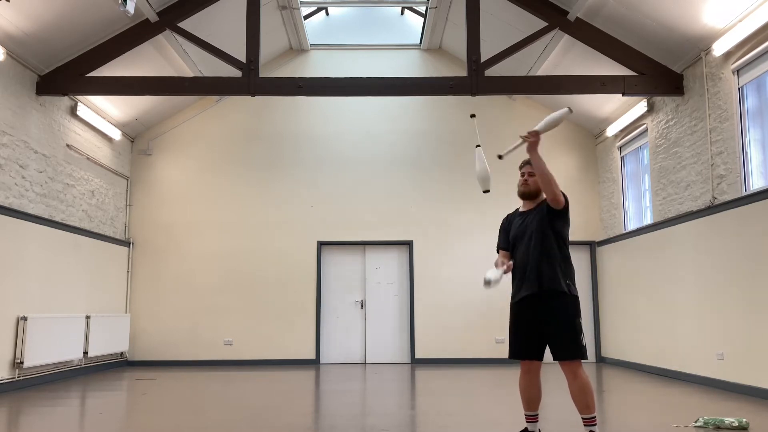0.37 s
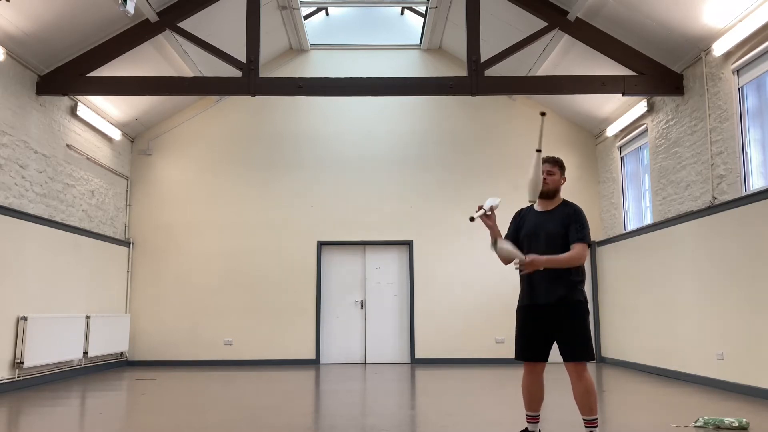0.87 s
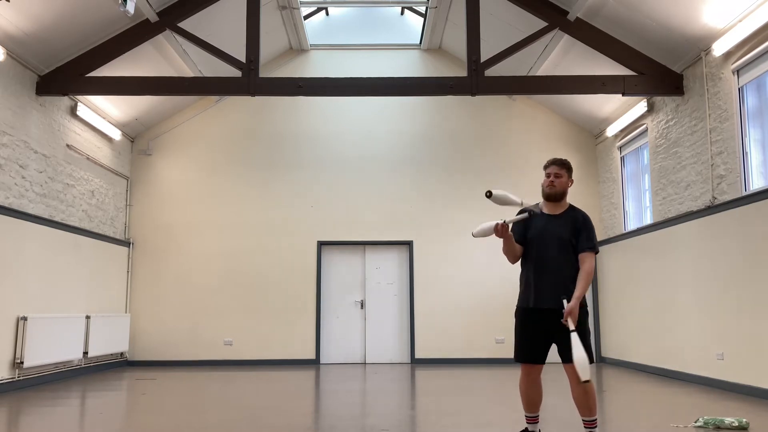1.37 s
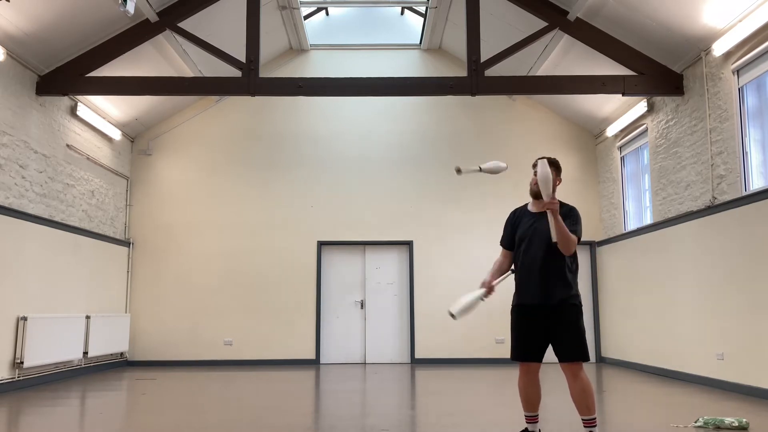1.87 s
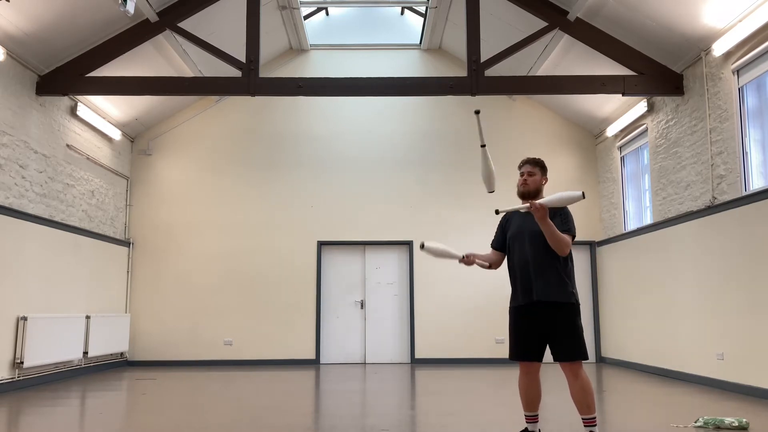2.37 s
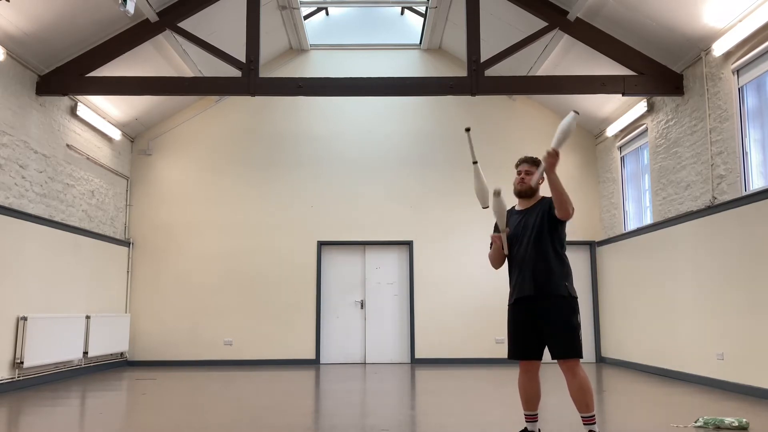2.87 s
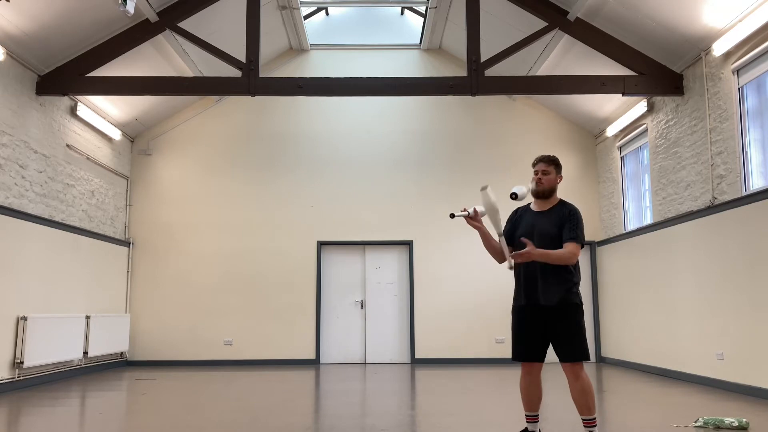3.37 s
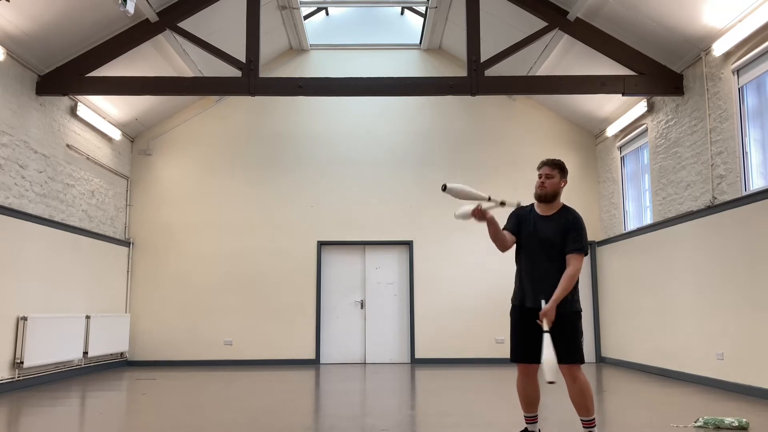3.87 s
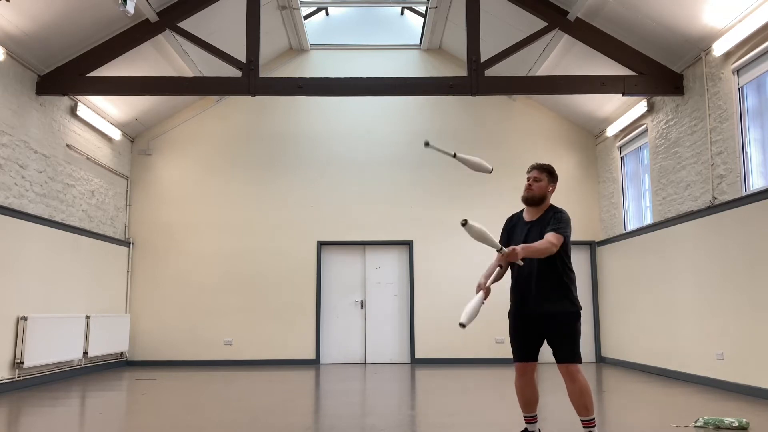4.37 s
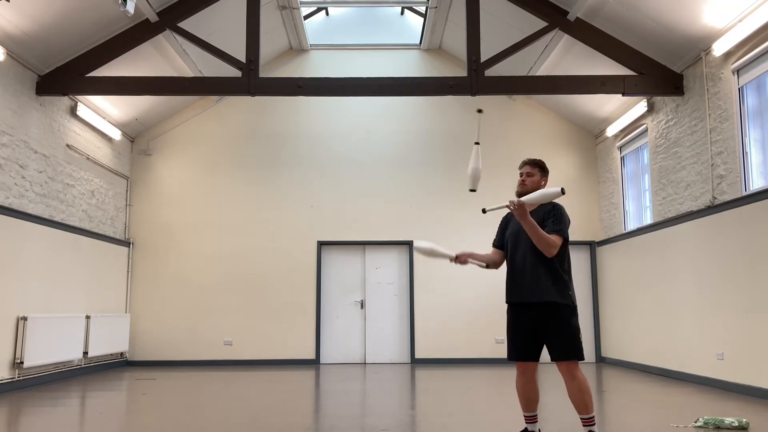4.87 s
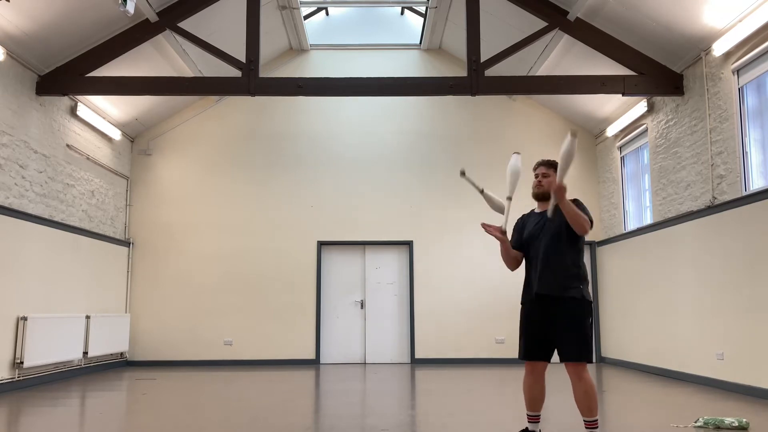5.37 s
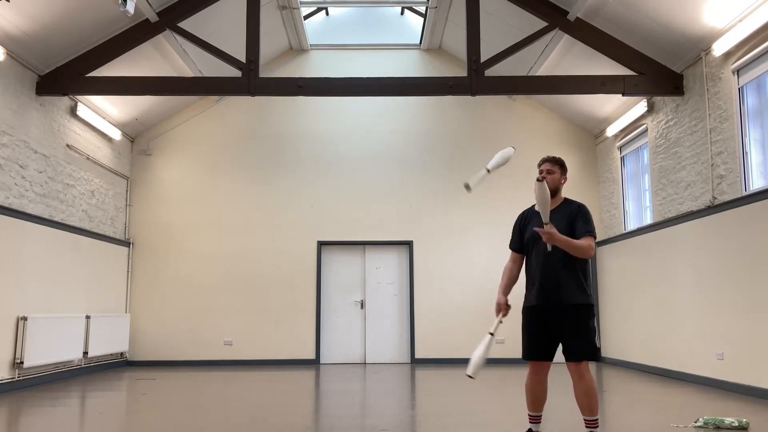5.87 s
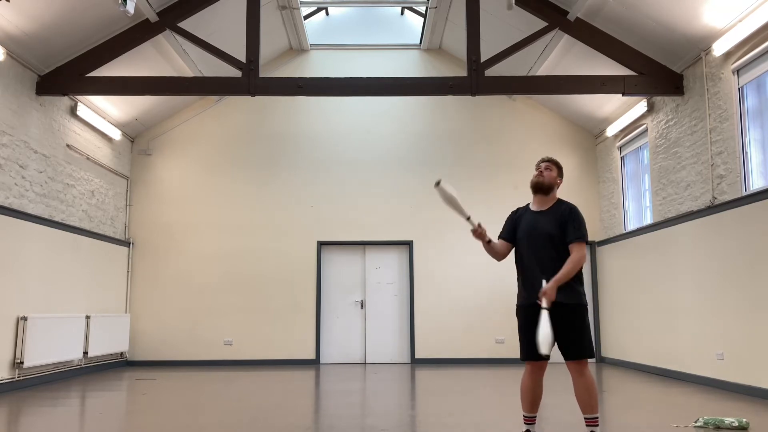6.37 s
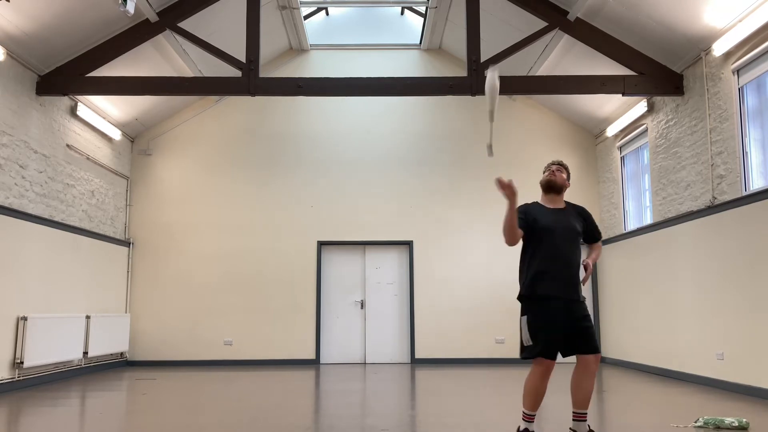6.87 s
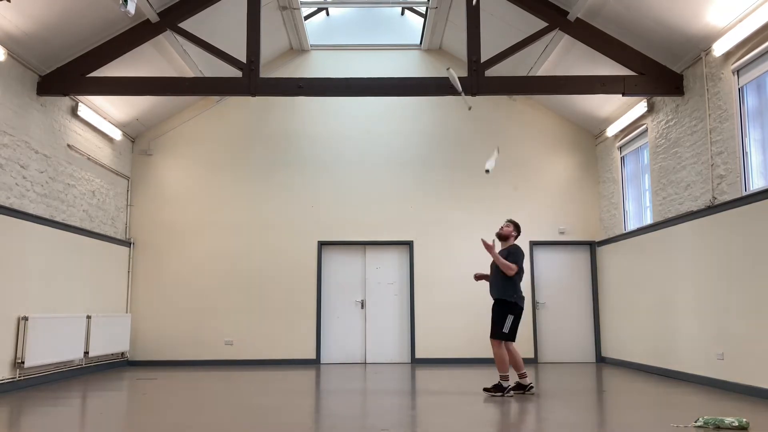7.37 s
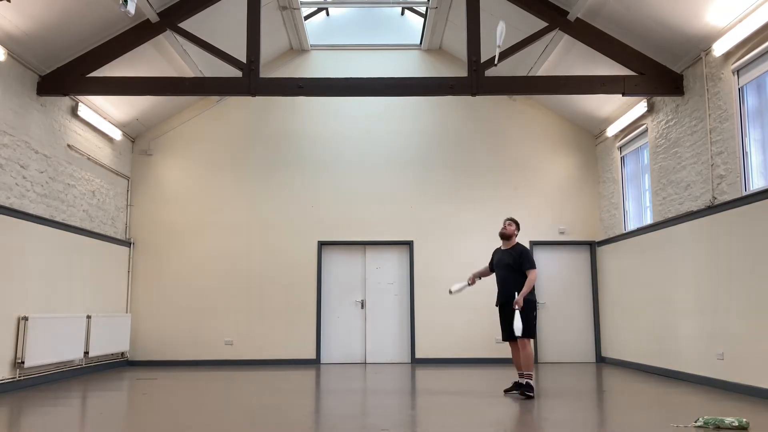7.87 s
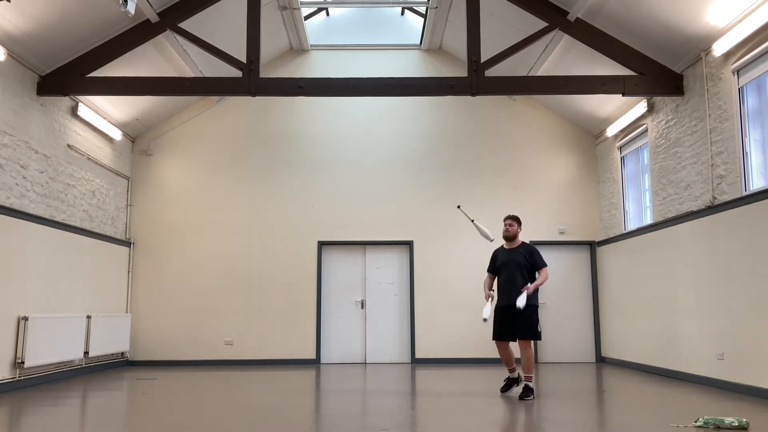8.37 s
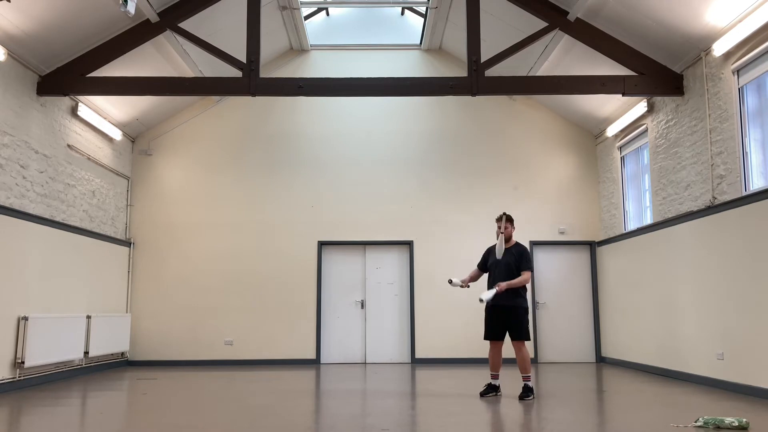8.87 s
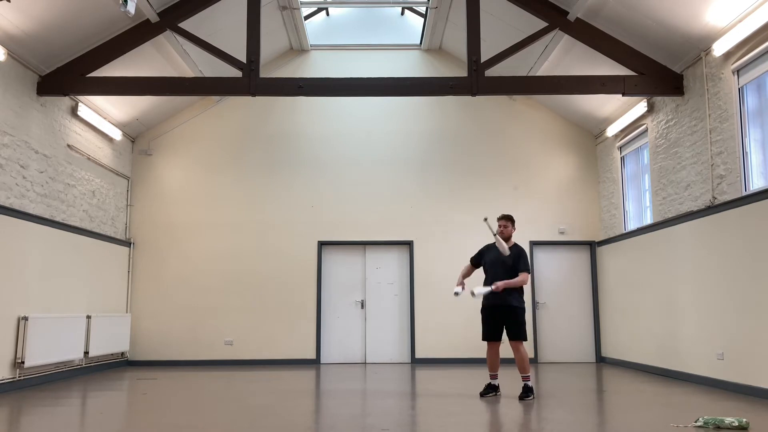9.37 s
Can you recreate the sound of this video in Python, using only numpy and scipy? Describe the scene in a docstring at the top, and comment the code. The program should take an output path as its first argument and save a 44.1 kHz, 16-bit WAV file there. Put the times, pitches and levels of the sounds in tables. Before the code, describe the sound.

A juggler's hollow plastic clubs clack against each other at a steady slow pace, each sharp knock ringing into a long two-second hall echo. Between them come much softer palm catches and faint low foot thumps. Late on, soles scuff, the sound dips for an instant, and only catches follow from farther away. Phone microphone a few metres off, over low room tone.

```python
"""Hollow plastic clubs knock and slap in a large bare hall, some metres from a phone; its tail is there at
once. Each blow rings the modes of a club's shell for a few milliseconds, with a low jolt of hand and arm. The
floor mirrors it, single echoes follow, then a two-second tail of decaying noise. Room tone, booming boards, low
thumps and scuffing soles are shaped noise and short damped pushes. Late on the scene changes: the level dips
briefly and the juggling resumes from further off."""
import sys
import numpy as np
from scipy import signal
from scipy.fft import rfft, irfft, next_fast_len
from scipy.io import wavfile
from scipy.ndimage import uniform_filter1d

SR = 44100
rng = np.random.default_rng(int(sys.argv[2]) if len(sys.argv) > 2 else 0)


def unload_audio(sound):
    """Save the sound as a 16-bit wav file, at the path given as the first command line argument."""
    columns = np.transpose(np.atleast_2d(sound))
    # keep every value between -1 and 1, then stretch to whole-number steps
    steps = np.round(np.clip(columns, -1, 1) * 32767)
    wavfile.write(sys.argv[1], SR, steps.astype(np.int16))


def boost_factor(decibels):
    """Convert a level in decibels to a linear amplitude factor."""
    exponent = np.asarray(decibels, float) / 20
    return 10 ** exponent


N = 429093  # samples, 9.73 s

LEAD = 128  # samples of rise before a blow's peak
KNOCK_JOLT_DB, CATCH_JOLT_DB = -22, -18  # jolt of hand and arm, relative to the hollow mode


def on_log(hz, table):
    """Reads (frequency [Hz], value) points on a log-frequency axis."""
    f, v = np.transpose(table)
    return np.interp(np.log(np.maximum(hz, 1)), np.log(f), v)


def stereo_noise(size):
    """Spectra of left and right noise, alike in the bass and unlike in the treble."""
    # likeness of the two sides: (frequency [Hz], left-right correlation [-1..1])
    likeness = [(100, .97), (200, .92), (350, .65), (500, .4), (1000, .15), (4000, .15), (10000, -.1)]
    hz = np.arange(size // 2 + 1) * SR / size
    like = np.clip(on_log(hz, likeness), -1, 1)
    mid, side = rfft(rng.standard_normal((2, size)))
    common = np.sqrt((1 + like) / 2) * mid
    opposed = np.sqrt((1 - like) / 2) * side
    return hz, common + opposed * np.array([[1], [-1]])


def coloured(tone):
    """Steady stereo noise with a given spectrum, rms 1."""
    size = next_fast_len(N)
    hz, pair = stereo_noise(size)
    x = irfft(pair * boost_factor(on_log(hz, tone)), size)[:, :N]
    return x / np.sqrt(np.mean(x ** 2))


def hall(echoes, tail_db, rise_ms):
    """Answer of the hall: single dull echoes, then a dense tail that dies band by band."""
    # how long the tail takes to fall 60 dB: (frequency [Hz], decay time [s])
    decay_times = [(60, 0.8), (130, 0.72), (260, 1.01), (700, 2.08), (1800, 1.95), (4800, 1.74),
                   (8000, 0.92), (14000, 0.29)]
    echo_scatter, echo_top_hz = 0.66, 2580  # share of each echo that brick and beams break up; low-pass
    size = int(5 * SR / 2)
    t = np.arange(size) / SR
    hz, pair = stereo_noise(size)
    tail, early = np.zeros((2, 2, size))

    octave = np.log2(np.maximum(hz, 1))
    for centre in np.arange(5, 15):
        share = np.cos(np.pi / 2 * np.clip(octave - centre, -1, 1)) ** 2
        decay = boost_factor(-60 * t / on_log(2. ** centre, decay_times))
        tail += irfft(pair * share, size) * decay

    for delay_ms, left_db, right_db in echoes:
        i = int(delay_ms * SR / 1000)
        gain = boost_factor(np.array([[left_db], [right_db]]))
        spray = rng.standard_normal(128) * np.hanning(128) / 7
        early[:, i:i + 1] += gain * (1 - echo_scatter)
        early[:, i:i + 128] += gain * echo_scatter * spray
    early = signal.sosfilt(signal.butter(1, echo_top_hz, fs=SR, output="sos"), early)

    build_up = 1 - np.exp(-(1000 * t / rise_ms) ** 2)
    return early + boost_factor(tail_db) * tail * build_up


def room_tone():
    """The hall at rest: steady noise, strongest in the bass."""
    # colour of the empty hall: (frequency [Hz], relative level per Hz [dB])
    room_colour = [(25, 10), (200, -9), (400, 0.5), (500, 5.5), (2560, -12), (6700, -19.5), (15000, -33.5)]
    return boost_factor(-55) * coloured(room_colour)


def floor_rumble():
    """The boards boom under shifting weight: bass noise that swells and sinks."""
    # colour of the boards: (frequency [Hz], relative level per Hz [dB])
    tread_colour = [(15, -33), (30, -10), (90, -13.5), (140, -11), (210, -8.5), (320, -15), (500, -35),
                    (1000, -84)]
    # loudness of the boards: (time [s], level [dB])
    tread_levels = [(0.0, -68), (0.4, -58), (0.76, -58), (1.14, -68), (1.92, -60), (2.33, -72), (2.76, -62),
                    (3.3, -60), (3.8, -68), (4.2, -63), (5.07, -58), (5.94, -66), (6.6, -60), (7.13, -51.5),
                    (8.3, -63), (8.51, -56), (8.97, -60), (9.73, -54)]
    times, levels = np.transpose(tread_levels)
    gain = boost_factor(np.interp(np.arange(N) / SR, times, levels, left=-140, right=-140))
    return coloured(tread_colour) * gain


def club(hollow_db, hollow_hz, knock_db, snap_db, crack_db, chance):
    """One blow: the shell modes, weighted by the hardness of the contact, add in power."""
    # modes of the club shell, the air-filled body first: (frequency [Hz], level [dB], width [Hz])
    shell_modes = [(670, -2, 115), (485, -5.5, 190), (846, -1, 480), (1169, -1.5, 446), (1560, -7.5, 425),
                   (1943, -2, 485), (2560, 4, 950), (3330, 3.5, 1140), (4110, 3.5, 1000), (4940, 3, 1200),
                   (6780, 10.5, 2860), (10940, 16.5, 4000), (15000, 6, 2400)]
    mode_scatter_db, blur_rad, lag_ms = 1.0, .4, 2.2  # phase blur and lag are those at 1 kHz
    palm_damping = 0.19  # dB lost by the upper knock mode per dB of slap
    size = len(chance)
    hz = np.arange(size // 2 + 1) * SR / size

    # a slapping palm stays on the shell
    held_db = knock_db - palm_damping * max(0, 9.5 + crack_db - knock_db)
    contact = [(800, (hollow_db + knock_db) / 2), (1150, knock_db), (1950, held_db),
               (2800, snap_db), (4800, crack_db)]
    modes = [(hollow_hz, *shell_modes[0][1:])] + shell_modes[1:]
    power = 1e-18
    for k, (mode_hz, db, width) in enumerate(modes):
        push_db = on_log(mode_hz, contact) if k else hollow_db
        gain = boost_factor(db + push_db + mode_scatter_db * chance[k]) * SR / (np.pi * width)
        detune = (hz ** 2 - mode_hz ** 2) / (np.maximum(hz, 1) * width)
        power = power + gain ** 2 / (1 + detune ** 2) ** 2

    # minimum phase: nothing rings before the blow
    cepstrum = irfft(np.log(power) / 2)
    cepstrum[1:size // 2] *= 2
    cepstrum[size // 2 + 1:] = 0

    # low bending waves travel slowly along the shell, so the knock falls in pitch
    root = np.sqrt(hz / 1000)
    late = 4 * np.pi * lag_ms * root
    smooth_chance = np.sqrt(24) * uniform_filter1d(chance, size=24)[:len(hz)]
    blur = blur_rad * root * smooth_chance
    x = np.roll(irfft(np.exp(rfft(cepstrum) - 1j * (late + blur))), LEAD)

    rise = np.clip(np.arange(size) / LEAD, 0, 1) ** 2
    fade = np.clip(2 - 2 * np.arange(size) / (size / 2), 0, 1)
    return x * rise * fade


def blow(s, hollow_db, hollow_hz, over_db, aim_db, jolt_db):
    """A row for one blow, its knock, snap, crack and jolt turned from relative to absolute dB."""
    return (s, hollow_db, hollow_hz, *(hollow_db + np.array(over_db)), aim_db, hollow_db + jolt_db)


def knocks():
    """Club strikes club: hard plastic on plastic, the loudest blows."""
    # the first falls before we listen, its tail hangs on:
    # (time [s], hollow level [dB], hollow pitch [Hz], knock over hollow [dB], snap over hollow [dB])
    club_knocks = [(-1.0, -1.5, 654, -6.5, -14), (0.144, -17.5, 656, 2, -4.5), (1.39, -19, 683, 2, -7),
                   (2.58, -13.5, 662, -1, -3.5), (3.818, -16.5, 656, 2.5, -7),
                   (5.024, -13.5, 650, -.5, -4.5)]
    crack_db, aim_db = -15, -1.6  # crack relative to the knock; direct sound
    return [blow(s, db, hz, (knock, snap, knock + crack_db), aim_db, KNOCK_JOLT_DB)
            for s, db, hz, knock, snap in club_knocks]


def thump(db, hz):
    """A soft push that rings for a cycle or two."""
    t = np.arange(4096) / SR
    u = t * hz / 0.3  # the envelope peaks after 0.3 cycle
    return boost_factor(db) * u * np.exp(1 - u) * np.sin(2 * np.pi * hz * t)


def catches():
    """A club lands in the palm: a softer blow with a slap of skin."""
    # (time [s], hollow level [dB], hollow pitch [Hz],
    #  knock over hollow [dB], snap over hollow [dB], skin slap over hollow [dB])
    palm_catches = [(0.614, -36, 684, -2.5, -23, -15), (1.092, -39.5, 696, -5, -13.5, -6.5),
                    (1.869, -40, 670, -4, -10, -11.5), (2.25, -38.5, 560, -3.5, -11.5, -7.5),
                    (3.009, -39, 705, 5, -14, -9), (3.469, -38, 542, -2, -1, -2),
                    (4.248, -33.5, 647, -2.5, -13.5, -12), (4.712, -33, 545, -12.5, -20, -17),
                    (5.46, -31, 700, -7, -19, -19), (6.265, -31, 560, .5, -2, -5.5),
                    (7.528, -26.5, 678, -9, -16.5, -14), (7.829, -26.5, 700, -.5, -1.5, -5.5),
                    (8.324, -25.5, 726, -2.5, -10, -5), (8.659, -35.5, 542, -6, -12.5, -13.5),
                    (9.093, -42, 500, -11, -10, -11.5), (9.159, -29.5, 548, -.5, -7, -2)]
    return [blow(s, db, hz, over, -.6, CATCH_JOLT_DB) for s, db, hz, *over in palm_catches]


def ticks():
    """Light hard ticks on the shell, mostly heard straight."""
    # (time [s], hollow level [dB])
    light_ticks = [(3.469, -50), (6.106, -52), (7.528, -44)]
    hollow_hz, aim_db = 655, 7
    over_db = (5.5, -4, -18)  # knock, snap, crack over hollow
    return [blow(s, db, hollow_hz, over_db, aim_db, KNOCK_JOLT_DB) for s, db in light_ticks]


def juggling(blows, thumps, echoes, tail_db, rise_ms):
    """Blows and thumps, heard straight and through the hall from shifting spots in the air."""
    # what the club beams straight at the phone: (frequency [Hz], level [dB])
    beam_colour = [(700, -4.5), (1400, 0), (2050, 5), (2900, 2), (5000, -1.5), (11000, -2.5)]
    spots = 4
    jolt_s, jolt_hz = .01, 205  # hand and arm take up each blow a little late
    # mirror image in the hard floor; its lag shifts with the height of the blow
    floor_ms, floor_spread, floor_db = 1.55, .08, -2.5
    lead = 2 * SR
    direct, spread = np.zeros(N + 2 * lead), np.zeros((spots, N + 2 * lead))
    chance = rng.standard_normal((len(blows), 4096))
    height = rng.standard_normal(len(blows) * 2 + len(thumps))

    sounds = [(s - LEAD / SR, club(*colour, row), aim_db)
              for (s, *colour, aim_db, _), row in zip(blows, chance)]
    jolts = [(s + jolt_s, jolt_db, jolt_hz) for s, *_, jolt_db in blows]
    sounds += [(s, thump(db, hz), 0) for s, db, hz in thumps + jolts]
    for k, (s, x, aim_db) in enumerate(sounds):
        i = int(s * SR) + lead
        j = i + int(floor_ms * (1 + floor_spread * height[k]) * SR / 1000)
        direct[i:i + len(x)] += boost_factor(aim_db) * x
        direct[j:j + len(x)] += boost_factor(aim_db + floor_db) * x
        spread[k % spots, i:i + len(x)] += x

    wet = 0
    for x in spread:
        answer = hall(echoes, tail_db, rise_ms)  # every spot has its own tail
        wet = wet + signal.fftconvolve(x[None], answer, axes=1)[:, lead:lead + N]
    hz = np.linspace(0, SR / 2, 129)
    beam = signal.firwin2(255, hz, boost_factor(on_log(hz, beam_colour)), fs=SR)
    return signal.fftconvolve(direct, beam, "same")[lead:lead + N] + wet


def scuffs(rows):
    """Soles scuff: each slide of noise swells, holds and dies away."""
    # colour of a sliding sole: (frequency [Hz], relative level per Hz [dB])
    scuff_colour = [(500, -40), (1500, -20), (4700, -22), (5300, -16), (5800, -22), (10000, -24),
                    (15000, -28)]
    swell_db, release_db_s = 16, 145  # rise over the attack [dB]; fall after the hold [dB/s]
    t, power = np.arange(N) / SR, 0
    for s, attack, hold, db in rows:
        rise = np.clip((t - s) / attack, 0, 1)
        fall_db = release_db_s * np.maximum(t - s - attack - hold, 0)
        power = power + (t > s) * boost_factor(db - swell_db * (1 - rise) - fall_db) ** 2
    return coloured(scuff_colour) * np.sqrt(power)


def scene():
    """Near part fades out with its tail; far part starts on an empty hall."""
    # first echoes, near then far position: (delay [ms], left level [dB], right level [dB])
    first_echoes = [
        [(2.5, -14, -5), (7, -9, -10), (15.9, -1, 3.5), (19.94, 1, -19), (23.4, 3, 3.5), (27.92, -12, -17),
         (35.3, -5, -9), (48.4, -17, -2)],
        [(7, -8, -8), (14.2, 0, 5), (21.03, 5.5, -11), (38.15, 2.5, 6.5), (56, -3, -4)],
    ]
    # low thumps, probably feet: (time [s], level [dB], pitch [Hz])
    foot_thumps = [(0.342, -48, 172), (1.52, -44, 94), (2.679, -43, 188), (3.949, -42.5, 101),
                   (5.468, -47, 93.3), (6.83, -46, 218), (9.165, -34, 190)]
    # soles slide: (time [s], attack [s], hold [s], level [dB])
    sole_slides = [(5.774, .006, .03, -59), (5.85, .006, .03, -55), (6.74, .1, .3, -53),
                   (7.15, .12, .2, -54.5)]
    dip_s, fade_out_s, fade_in_s = 7.115, 0.027, .05
    blows = sorted(knocks() + catches() + ticks())

    def before(rows):
        return [r for r in rows if r[0] < dip_s]

    def after(rows):
        return [r for r in rows if r[0] >= dip_s]

    near = juggling(before(blows), before(foot_thumps), first_echoes[0], tail_db=-26.5, rise_ms=20)
    near = near + scuffs(before(sole_slides))
    far = juggling(after(blows), after(foot_thumps), first_echoes[1], tail_db=-22.5, rise_ms=12)
    far = far + scuffs(after(sole_slides))
    steady = floor_rumble() + room_tone()

    t = np.arange(N) / SR
    fade_out = np.clip((dip_s - t) / fade_out_s, 0, 1)
    fade_in = np.clip((t - dip_s) / fade_in_s, 0, 1)
    return fade_out * near + far + (fade_out + fade_in) * steady


def low_pass(x):
    """Removes everything above the highest recorded frequency."""
    return signal.sosfilt(signal.butter(12, 16980, fs=SR, output="sos"), x)


def record(dry):
    """The treble has deep gaps that differ between sum and difference; the left is a little hotter."""
    # treble gaps, and a fall in the lowest bass: (frequency [Hz], sum level [dB], difference level [dB])
    treble_gaps = np.array([(24.8, -20, -17), (58, 0.5, 0), (8300, 2, 3.5), (8870, -13.5, -2),
                            (8700, -21, 11.5), (9810, -3, 0), (11200, -1.5, -21), (12700, -2, 0),
                            (13500, -29, 2), (14300, -13, -4), (15000, 3, -18), (15800, -10, -37),
                            (16800, -35, -40)])
    left_db = 1.6  # left over right, ahead of the gaps
    size = next_fast_len(N)
    hz = np.arange(size // 2 + 1) * SR / size
    left, right = rfft(dry * boost_factor(np.array([[left_db], [-left_db]]) / 2), size)
    mid = (left + right) / 2 * boost_factor(on_log(hz, treble_gaps[:, [0, 1]]))
    side = (left - right) / 2 * boost_factor(on_log(hz, treble_gaps[:, [0, 2]]))
    mix = irfft([mid + side, mid - side], size)[:, :N]
    return low_pass(mix)


dry = scene()
out = record(dry)
unload_audio(out)
```